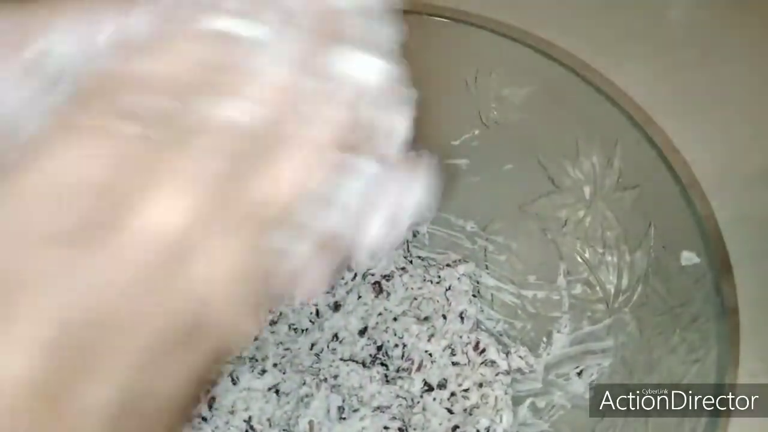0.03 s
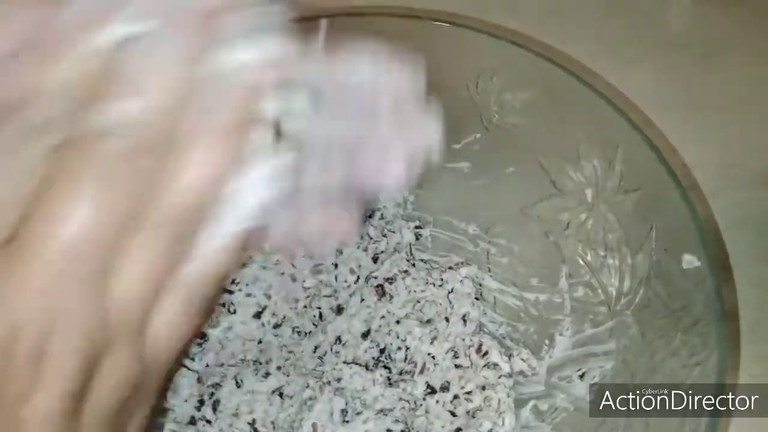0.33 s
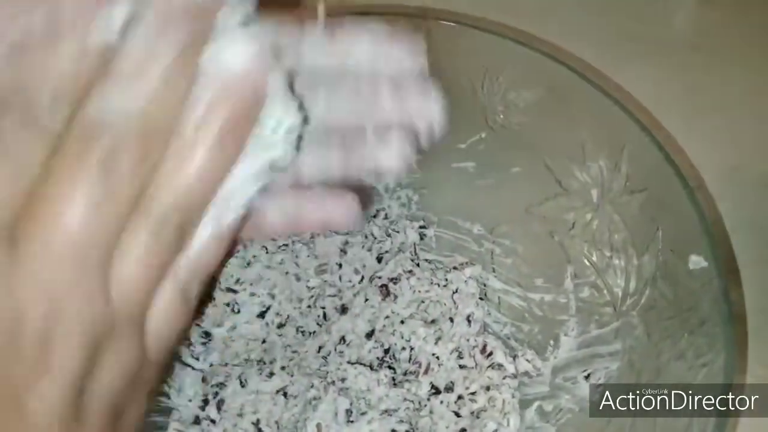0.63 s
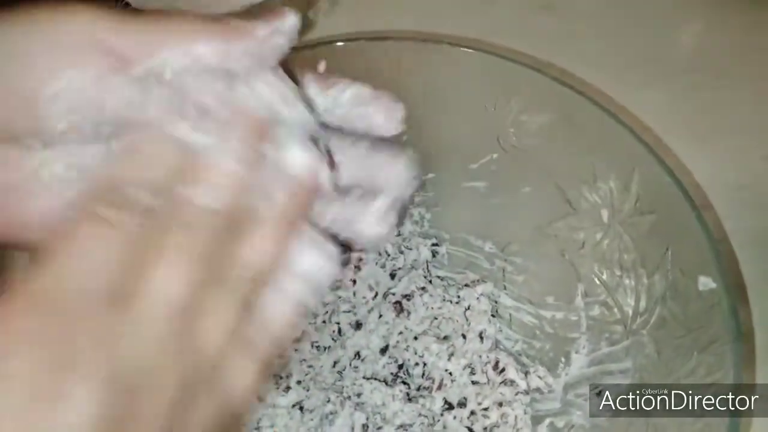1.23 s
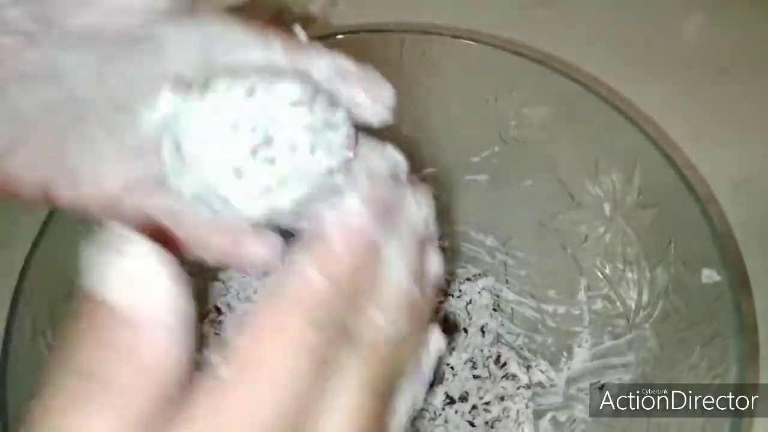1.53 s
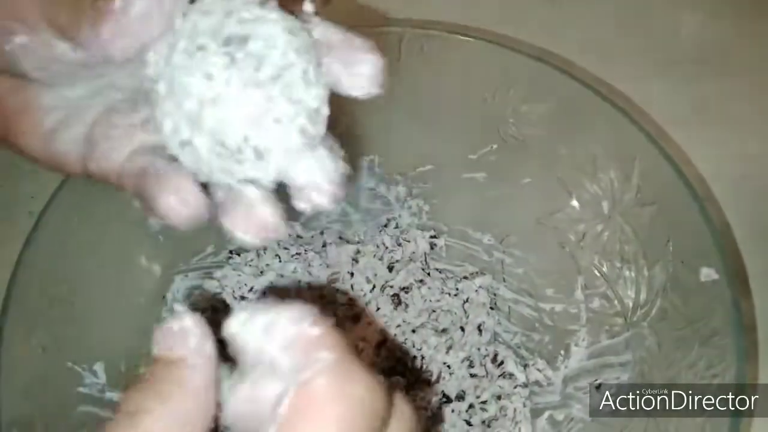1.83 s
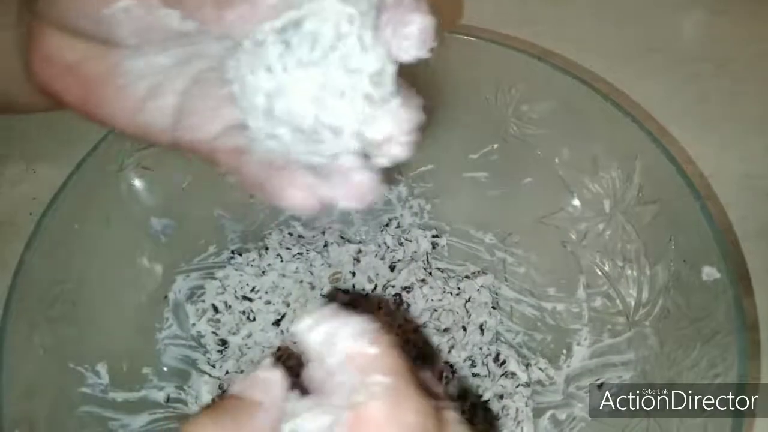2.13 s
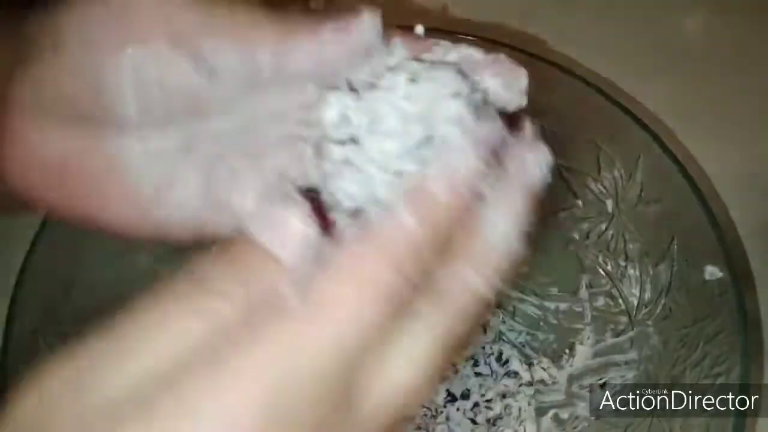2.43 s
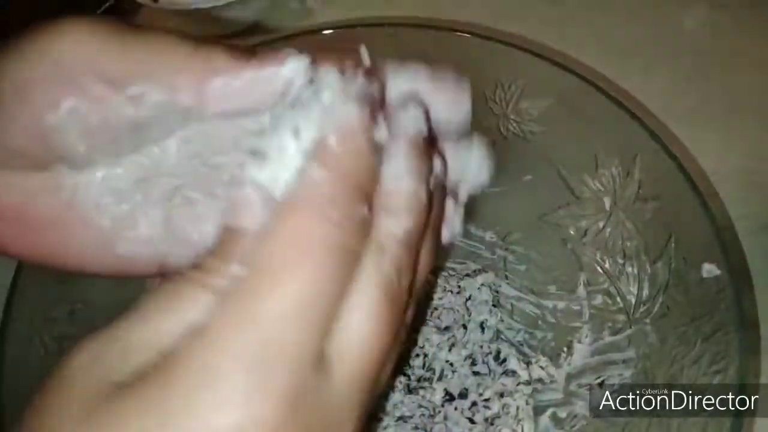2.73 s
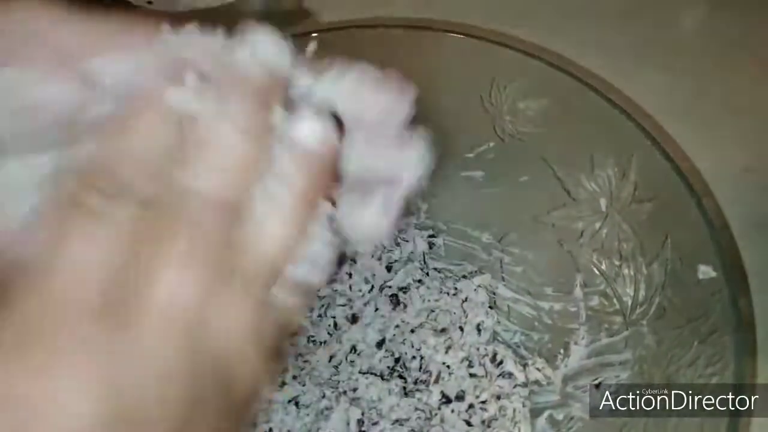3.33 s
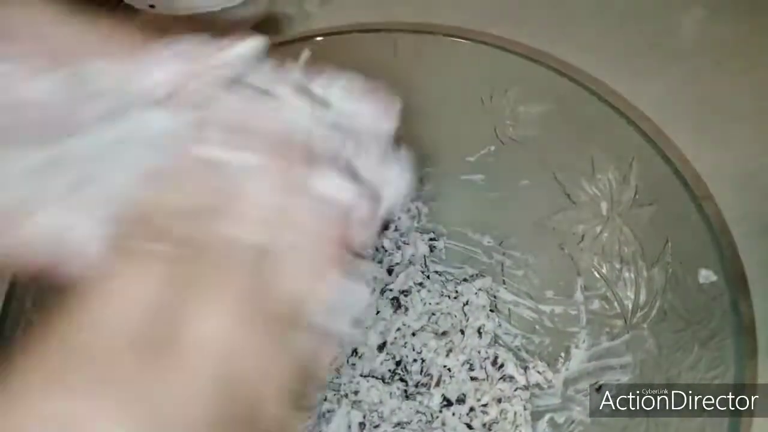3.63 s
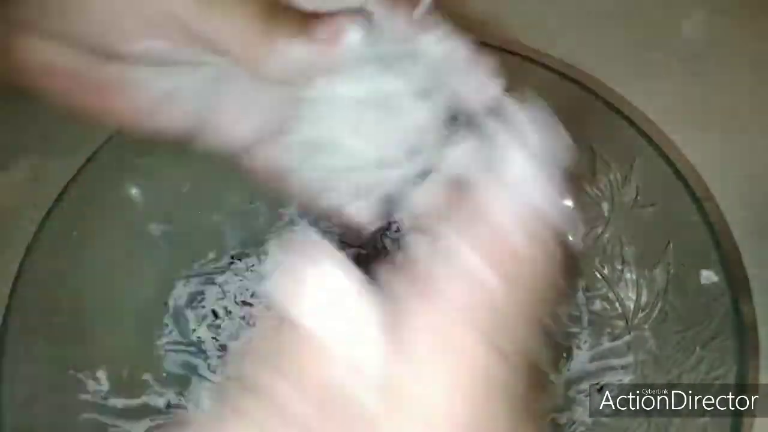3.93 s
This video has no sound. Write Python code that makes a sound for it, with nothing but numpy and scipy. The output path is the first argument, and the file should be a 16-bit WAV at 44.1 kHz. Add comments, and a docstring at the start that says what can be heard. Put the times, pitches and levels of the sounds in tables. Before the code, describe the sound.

Sticky crackling comes from two palms rolling a soft cheese ball, about seven quick strokes a second for the first 1.5 seconds, with small air pops and sharp little ticks. A pause follows, with a few faint snaps, the clearest near 2.3 seconds. From 3 seconds the rolling resumes more lightly. A low motor hum, probably a fridge, and kitchen rumble continue throughout.

```python
"""A motor, probably the fridge, hums over low kitchen rumble from start to end.
For 1.5 s two palms roll a soft, sticky cheese ball, about seven strokes a second. Each stroke is a dense
crackle of cheese peeling off skin, with a few louder pops of trapped air and ticks of snapping threads.
A pause follows, with a few faint snaps; from 3 s the rolling goes on more lightly.
The two microphones colour the treble differently."""
import sys
import numpy as np
from scipy import signal
from scipy.fft import rfft, irfft, next_fast_len
from scipy.io import wavfile

SR = 44100
rng = np.random.default_rng(int(sys.argv[2]) if len(sys.argv) > 2 else 0)


def digitize_waveform(pressure):
    """Quantize a signal to 16-bit integers and store it at the path in sys.argv[1].

    Rows of a 2-D input are taken as channels; values are limited to [-1, 1].
    """
    field = np.atleast_2d(pressure).T
    bounded = np.clip(field, -1, 1)
    quanta = np.round(bounded * 32767).astype(np.int16)
    wavfile.write(sys.argv[1], SR, quanta)


N = 176400
TIME_S = np.arange(N) / SR
FFT_SIZE = next_fast_len(N + SR // 2)
FREQS_HZ = np.maximum(np.arange(FFT_SIZE // 2 + 1) * SR / FFT_SIZE, 1)
ROOM_T60_S, ROOM_ONSET_S = 0.098, 0.00038


def from_db(db):
    """Decibels to gain."""
    return 10 ** (np.asarray(db) / 20)


def unit_rms(x):
    """Scale to unit power."""
    return x / np.sqrt(np.mean(x ** 2) + 1e-20)


def per_bin(points):
    """Interpolate (freq_hz, value) rows over log frequency."""
    hz, value = np.transpose(points)
    return np.interp(np.log(FREQS_HZ), np.log(hz), value)


def drift(corner_hz):
    """Low-passed noise, unit rms."""
    spectrum = rfft(rng.standard_normal(FFT_SIZE)) / (1 + (FREQS_HZ / corner_hz) ** 2)
    return unit_rms(irfft(spectrum, FFT_SIZE)[:N])


def cavity(x, hz, width):
    """Small damped resonance; width is bandwidth over pitch."""
    return signal.lfilter(*signal.iirpeak(min(hz, SR / 3), 1 / width, fs=SR), x + 1e-18)


def low_cut(x, corner_hz=1070):
    """Threads and bonds are too small to radiate bass."""
    return signal.sosfilt(signal.butter(2, corner_hz, "high", fs=SR, output="sos"), x + 1e-18)


def reflections(x):
    """Diffuse tail off bowl and worktop; changes as the hands move, differs at each microphone."""
    decay = from_db(-60 / (ROOM_T60_S * SR)) ** 2
    energy = signal.lfilter([1 - decay], [1, -decay], x ** 2 + 1e-18)
    return np.sqrt(np.interp(TIME_S - ROOM_ONSET_S, TIME_S, energy)) * rng.standard_normal((2, N))


def mic_colour(x, response):
    """Microphone response: minimum phase, unit power gain."""
    cepstrum = irfft(np.log(unit_rms(from_db(per_bin(response)))), FFT_SIZE)
    cepstrum[1:FFT_SIZE // 2] *= 2
    cepstrum[FFT_SIZE // 2 + 1:] = 0
    return irfft(rfft(x, FFT_SIZE) * np.exp(rfft(cepstrum)), FFT_SIZE)[:N]


def rumble():
    """Room rumble and faint hiss; the channels are most alike near 140 Hz."""
    # noise spectrum: freq_hz, density_db_per_hz
    density = [(10, -59.5), (28, -70.5), (50, -87), (90, -79), (150, -89.5), (190, -88.5), (232, -79),
               (275, -85.5), (350, -86.5), (410, -93), (500, -91.5), (700, -101), (920, -102), (990, -111),
               (1200, -116), (1500, -121), (3000, -126), (5000, -130), (7200, -129), (10000, -132),
               (15500, -134)]
    # left-right likeness: freq_hz, correlation (before clipping)
    likeness = [(20, -1.1), (60, 0.16), (140, 0.89), (240, 0.52), (500, 0.58), (900, -.2), (2000, 0.52),
                (15000, -0.13)]
    mid, side = rfft(rng.standard_normal((2, FFT_SIZE)))
    correlation = np.clip(per_bin(likeness), -.99, .99)
    stereo = np.sqrt(1 + correlation) * mid + np.sqrt(1 - correlation) * side * np.array([[1], [-1]])
    return irfft(stereo * from_db(per_bin(density)) * np.sqrt(SR) / 2, FFT_SIZE)[:, :N]


def motor(pitch_hz=59.3, waver_hz=0.078, left_lag_s=0.00061):
    """Low motor hum with unsteady overtones and thin whines."""
    # hum partials: harmonic, rms_db, left_minus_right_db, flutter_ratio
    hum = [(1, -39.5, 1.6, 0.053), (2, -69.5, -8.5, 0.47), (3, -65, -0.5, 0.22), (5, -70, 3, 0.46),
           (6, -72.5, -9.5, 0.75)]
    # whines: pitch_hz, rms_db
    whines = [(861, -92), (887, -91.5), (2200, -99.5), (2965, -98.5), (3990, -105)]
    turn_rad = 2 * np.pi * np.cumsum(pitch_hz + waver_hz * drift(5.5)) / SR
    lag_rad = np.array([[2 * np.pi * pitch_hz * left_lag_s], [0]])  # same angle for every harmonic
    out = np.zeros((2, N))
    for harmonic, db, pan_db, flutter in hum:
        phase = round(harmonic) * turn_rad - lag_rad + rng.uniform(0, 2 * np.pi)
        tone = np.sqrt(2) * np.sin(phase) * (1 + flutter * drift(7.3))
        out += from_db([[db + pan_db / 2], [db - pan_db / 2]]) * tone
    for hz, db in whines:
        phase = 2 * np.pi * hz * TIME_S + drift(25) + rng.uniform(0, 2 * np.pi, (2, 1))
        out += from_db(db) * np.sqrt(2) * np.sin(phase)
    return out


def add_snap(out, start_s, db, hz, pan_db, width, room_db, decay_s=0.0002, bypass_db=-16.5):
    """A sub-millisecond burst and its diffuse tail ring a small cavity; a little bypasses it."""
    t = TIME_S[:SR // 8]
    span = slice(int(start_s * SR), min(int(start_s * SR) + len(t), N))
    direct = rng.standard_normal(len(t)) * np.exp(-t / decay_s)
    tail = rng.standard_normal((2, len(t))) * from_db(-60 * t / ROOM_T60_S) * (t > ROOM_ONSET_S)
    direct, tail = (unit_rms(cavity(x, hz, width) + from_db(bypass_db) * x) for x in (direct, tail))
    stereo = from_db([[pan_db / 2], [-pan_db / 2]]) * direct + from_db(room_db) * tail
    out[:, span] += from_db(db) * stereo[:, :span.stop - span.start] / np.sqrt(len(t))


def ticks(pitch_hz=11300, spread_oct=0.21, width=0.5, recoil_s=0.0011, recoil_db=-6.5):
    """A sticky thread snaps, then its other end lets go; faint stray ticks fall at random throughout."""
    # thread snaps: start_s, level_db, left_minus_right_db
    threads = [ (0.0417, -38, -14), (0.2793, -36, -24), (0.392, -33.5, 5), (0.4005, -34, -2),
               (0.524, -42.5, -15), (0.6868, -32, 1), (0.813, -42, -18), (0.8198, -38, -21),
               (1.083, -34.5, -11), (1.1260, -41, -19), (1.1615, -55, -13), (1.231, -39, -17),
               (1.369, -49, -21), (2.3202, -43.5, -9), (2.9137, -57.5, 6), (3.0485, -50, -9),
               (3.333, -58, -12), (3.5777, -43.5, -9)]
    stray_per_s, stray_db, stray_spread_db = 28, -65.5, 5
    hits = rng.random(N) < stray_per_s / SR
    stray = hits * from_db(stray_db + stray_spread_db * rng.standard_normal(N))
    out = cavity(stray + reflections(stray), pitch_hz, width)
    for start_s, db, pan_db in threads:
        for delay_s, offset_db in ((0, 0), (recoil_s * rng.uniform(0.72, 1.3), recoil_db)):
            hz = pitch_hz * 2 ** (spread_oct * rng.standard_normal())
            add_snap(out, start_s + delay_s, db + offset_db, hz, pan_db, width, room_db=-10)
    return low_cut(out)


def pops():
    """Trapped air breaks free and rings the cavity it leaves."""
    # air pockets: start_s, level_db, pitch_hz, left_minus_right_db
    pockets = [(0.015, -28, 4220, -10), (0.1279, -23.5, 4700, -15), (0.1286, -23.5, 4270, 4),
               (.2568, -28, 4440, -11), (0.267, -38, 4600, -4), (0.5433, -33, 8900, -10),
               (0.5729, -34, 2580, -13), (0.6713, -34.5, 5300, 4), (0.7181, -42.5, 5760, 7),
               (0.9874, -39.5, 5900, 0), (1.0898, -29.5, 3920, -10), (1.391, -45, 4350, -16),
               (1.555, -51, 5200, -3), (1.562, -50.5, 5180, -3), (2.718, -53.5, 4500, -2),
               (2.757, -58.5, 3770, -9), (3.077, -42, 5400, -8), (3.472, -42.5, 5500, -16),
               (3.48, -41.5, 5300, -12), (3.755, -42.5, 5000, -5), (3.768, -38, 7800, -1)]
    out = np.zeros((2, N))
    for start_s, db, hz, pan_db in pockets:
        add_snap(out, start_s, db, hz, pan_db, width=0.42, room_db=-1.5)
    return out


def peeling(bands=16, grains_per_s=2200, spread_db=4.5, clump_db=2.2, patchy_db=3.5, room_db=-1.5):
    """Tiny cheese-skin bonds snap in clumps; pitches come and go as the palms' hollow changes shape."""
    clumps = from_db(clump_db * drift(90))
    out = np.zeros((2, N))
    for hz in np.geomspace(1750, 14000, bands):
        sizes = from_db(spread_db * np.minimum(rng.exponential(1, N), 3))
        grains = sizes * (rng.random(N) < grains_per_s / bands / SR)
        grains = unit_rms(grains * clumps * from_db(patchy_db * drift(24)))
        pan_rad = rng.uniform(0, 2 * np.pi, N)
        direct = np.sqrt(2) * grains * np.array([np.cos(pan_rad), np.sin(pan_rad)])
        out += cavity(direct + from_db(room_db) * reflections(grains), hz, width=0.18)
    return unit_rms(low_cut(out))


def wet_body(x, body_db, band_hz=(2280, 4400)):
    """Broad low-treble bell: larger, wetter patches sound fuller."""
    bell = signal.butter(1, band_hz, "band", fs=SR)
    return x + signal.lfilter(*bell, x * (from_db(body_db) - 1) + 1e-18)


def strokes(attack_s=0.0081, release_s=0.0068, rub_hz=(264, 755), rub_db=-7.5):
    """Each palm slide gives peeling crackle and a dull rub under one envelope."""
    # palm slides: start_s, length_s, level_db, fall_over_stroke_db, body_db
    slides = [ (0.0, 0.056, -51.5, 11.5, 12), (0.097, 0.03, -71, -6.5, 2), (0.118, 0.13, -57.5, 6.5, 10),
              (0.248, 0.061, -54, 8.5, 6), (0.349, 0.033, -78.5, -10, 5), (0.386, 0.052, -56.5, 5.5, 3.5),
              (0.456, 0.057, -63.5, 24, 10.5), (0.512, 0.081, -66.5, -3, 7.5), (0.608, 0.033, -69.5, 14, 6),
              (0.657, 0.071, -67.5, -3, 4.5), (0.775, 0.025, -76, -12.5, 2), (0.81, 0.076, -56.5, 12.5, 3),
              (0.916, 0.033, -72, -4.5, -2), (0.958, 0.055, -71.5, -5.5, 7), (1.059, 0.021, -68.5, -2, 1),
              (1.078, 0.06, -57, 5, 8), (1.137, 0.034, -75.5, -0.5, 8.5), (1.224, 0.057, -57.5, 12, 1.5),
              (1.357, 0.059, -67.5, 2.5, 4), (1.515, 0.023, -73, 1, -3), (2.317, 0.017, -65.5, 9, 4),
              (3.038, 0.023, -78.5, -3.5, 5.5), (3.069, 0.023, -73.5, -2, 1),
              (3.202, 0.032, -74.5, -0.5, 10.5), (3.328, 0.033, -69, 3, 3.5), (3.377, 0.014, -69, 10, 6),
              (3.451, 0.039, -68.5, -5.5, 5), (3.597, 0.018, -71, 1, 4.5), (3.727, 0.058, -69.5, -1, 6)]
    crackle = peeling()
    rub_band = signal.butter(2, rub_hz, "band", fs=SR, output="sos")
    rub = from_db(rub_db) * unit_rms(signal.sosfilt(rub_band, rng.standard_normal((2, N))))
    sticky, palms = np.zeros((2, 2, N))
    for start_s, length_s, db, fall_db, body_db in slides:
        span = slice(max(int(start_s * SR), 0), int((start_s + length_s + .06) * SR))
        t = np.maximum(TIME_S[span] - start_s, 0)
        envelope = np.minimum(t / attack_s, 1) * np.exp(-np.maximum(t - length_s, 0) / release_s)
        envelope *= from_db(db - fall_db * np.minimum(t / length_s, 1))
        sticky[:, span] += wet_body(crackle[:, span] * envelope, body_db)
        palms[:, span] += rub[:, span] * envelope
    return sticky, palms


def scene():
    """Sticky sounds, coloured per microphone, over palm rub, motor and room."""
    # microphone responses: freq_hz, relative_db
    left_response = [(500, -15), (1400, -11), (2100, -14.5), (3500, -12.5), (5400, -10.5), (6700, -4.5),
                     (7450, 1), (8300, -8), (9400, -15), (11000, -25.5), (15200, -14)]
    right_response = [(500, -7), (1400, -10.5), (2100, -11.5), (3500, -10.5), (4300, -10.5), (5400, -11.5),
                      (7400, -12.5), (9200, -10), (10900, 1), (12400, -9.5), (14000, -16.5), (15200, -14.5)]
    sticky, palms = strokes()
    left, right = sticky + pops() + ticks()
    cheese = np.array([mic_colour(left, left_response), mic_colour(right, right_response)])
    return cheese + palms + motor() + rumble()


def record(dry):
    """Steep zero-phase low-pass."""
    cutoff_hz = 15750
    return signal.sosfiltfilt(signal.ellip(10, .05, 60, cutoff_hz, fs=SR, output="sos"), dry)


dry = scene()
out = record(dry)
digitize_waveform(out)
```